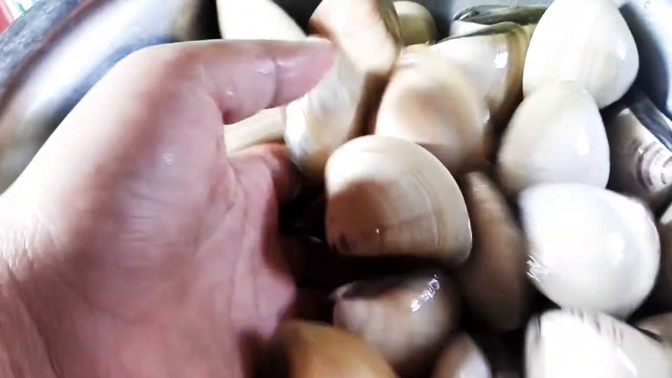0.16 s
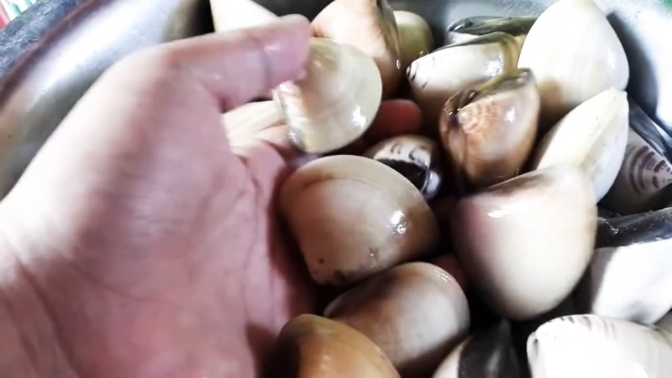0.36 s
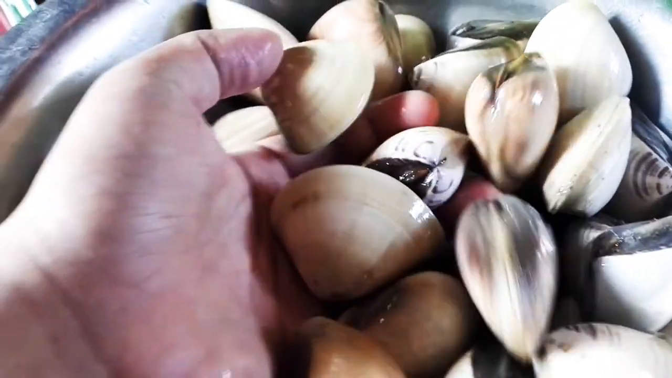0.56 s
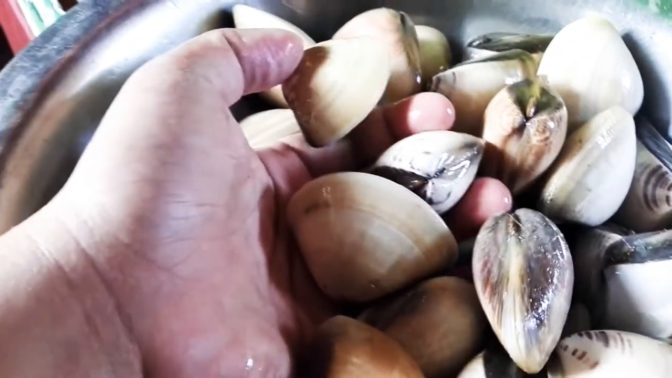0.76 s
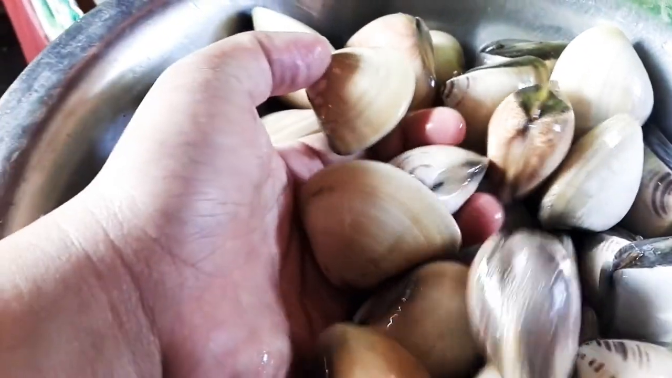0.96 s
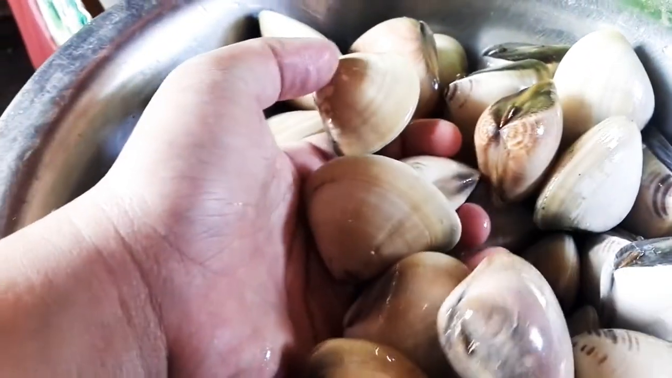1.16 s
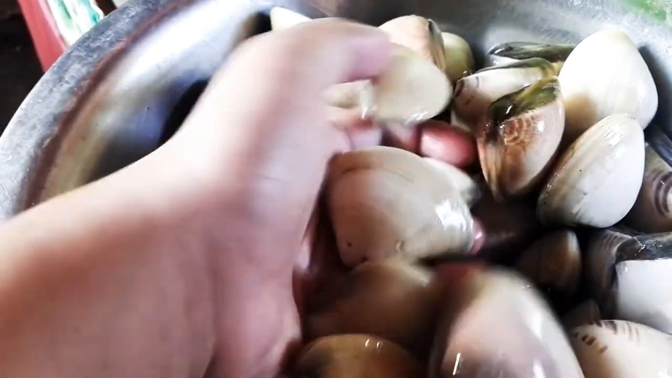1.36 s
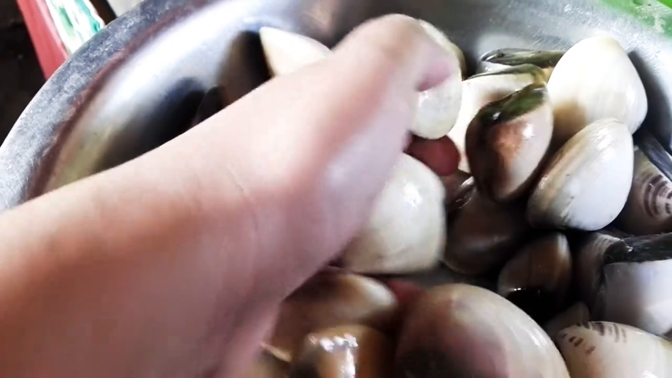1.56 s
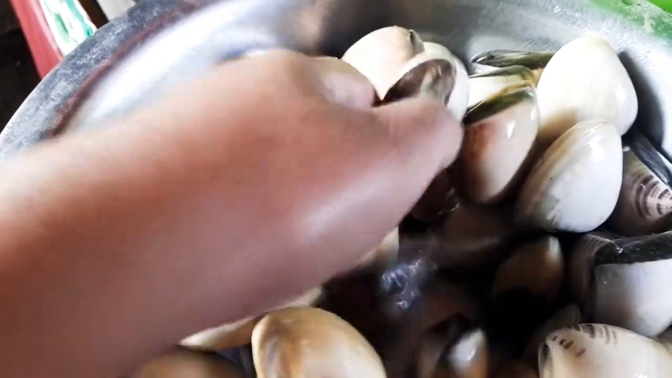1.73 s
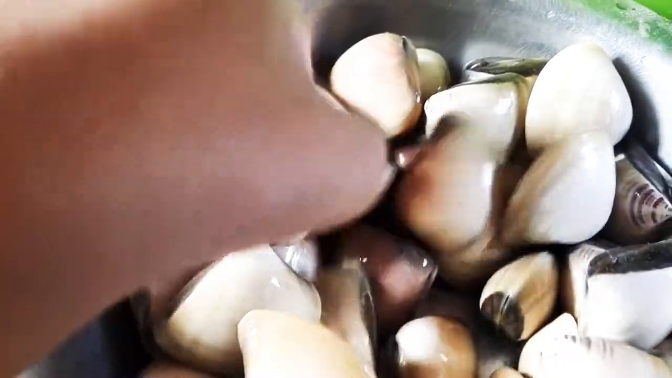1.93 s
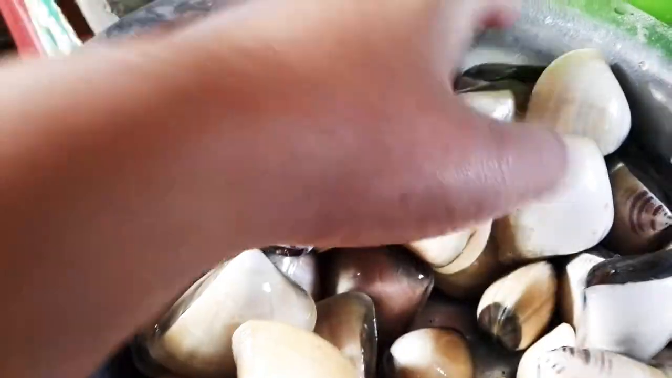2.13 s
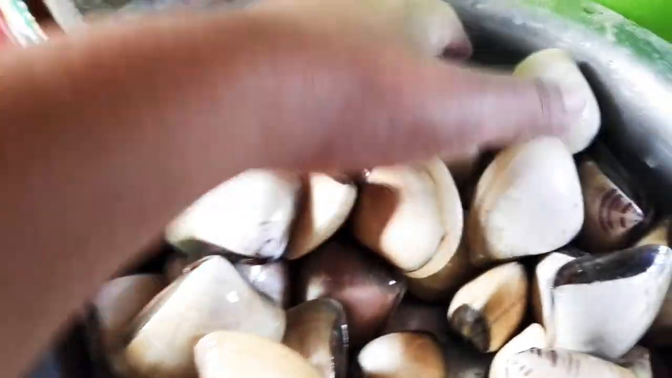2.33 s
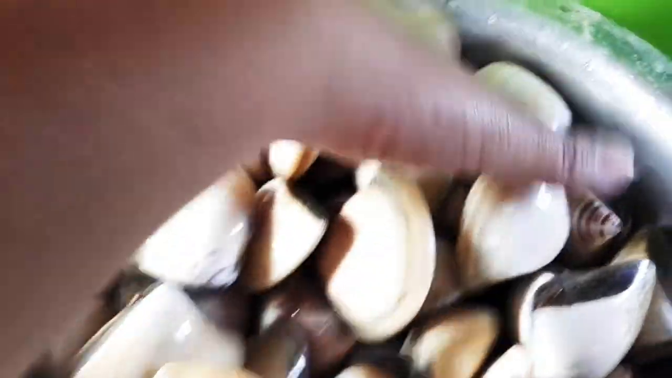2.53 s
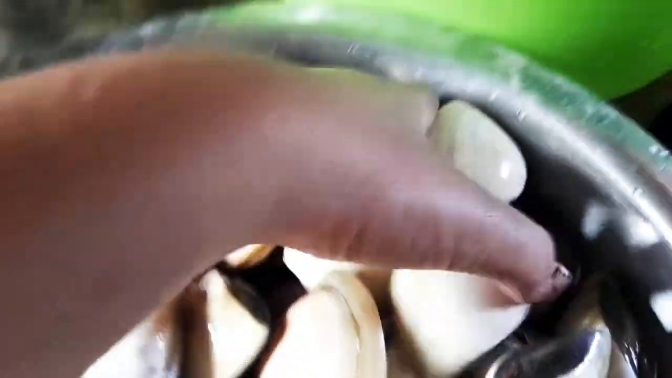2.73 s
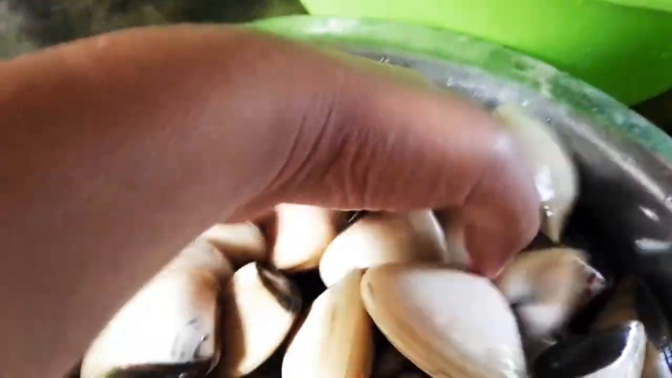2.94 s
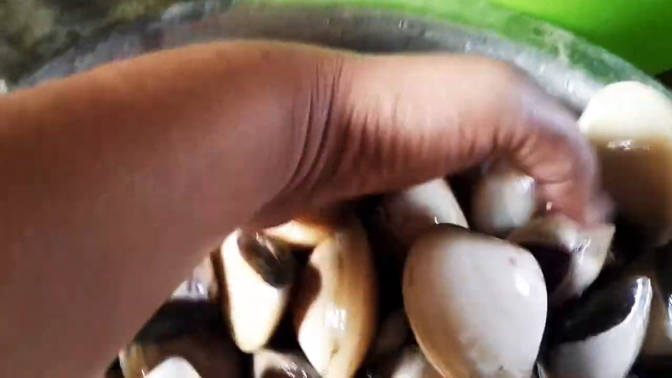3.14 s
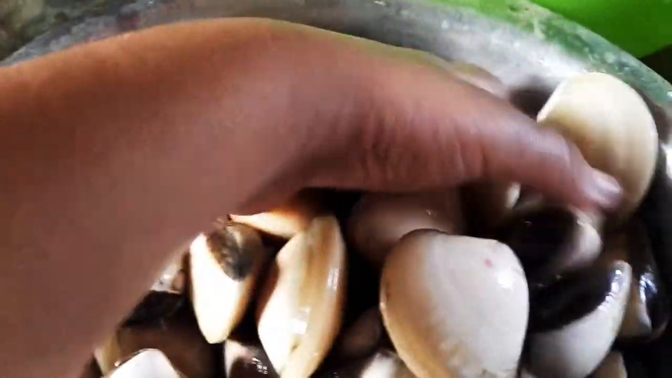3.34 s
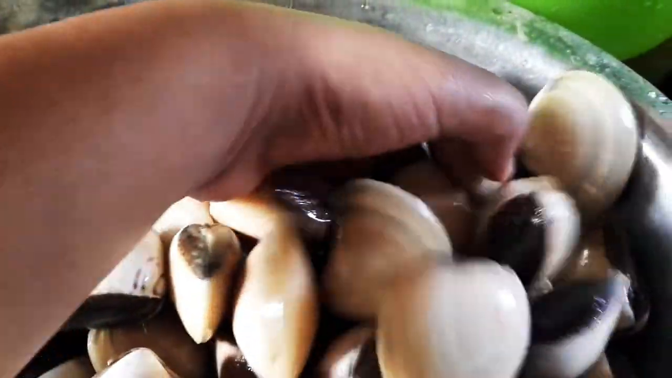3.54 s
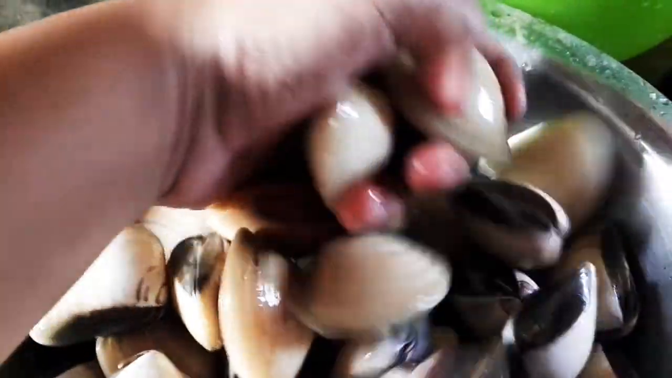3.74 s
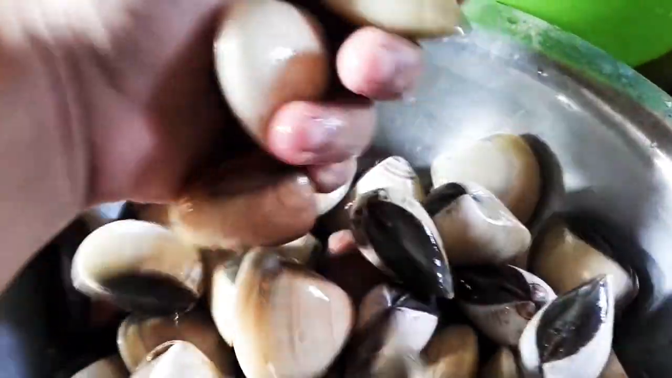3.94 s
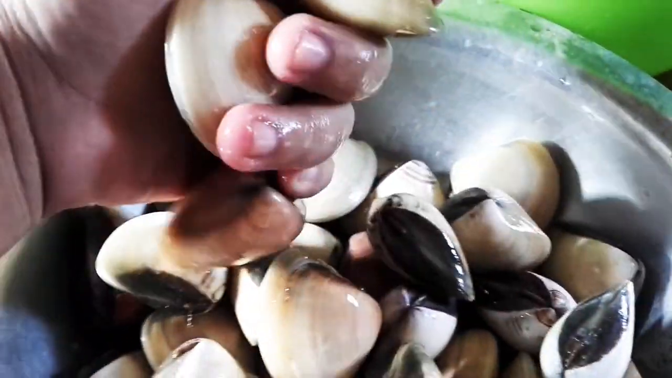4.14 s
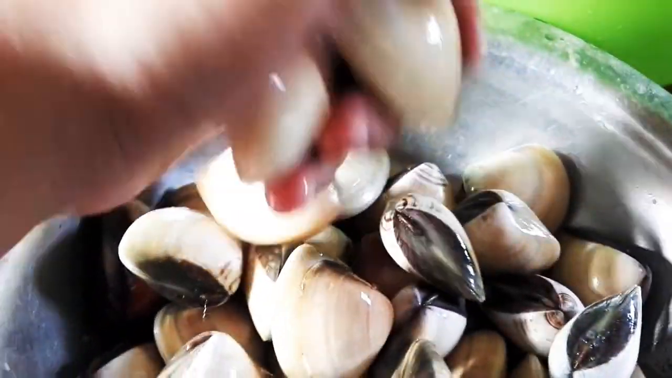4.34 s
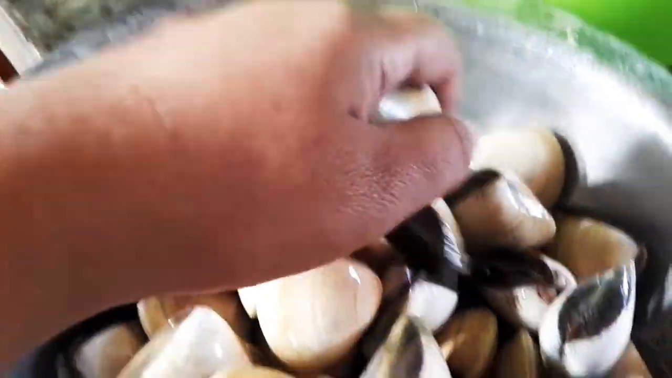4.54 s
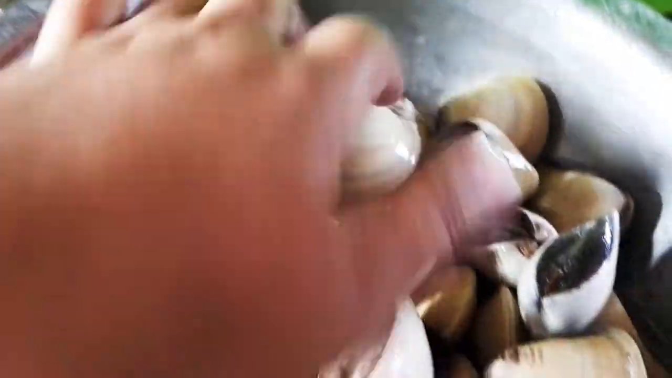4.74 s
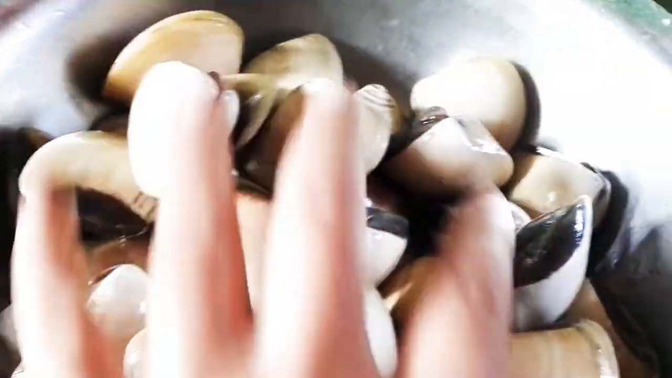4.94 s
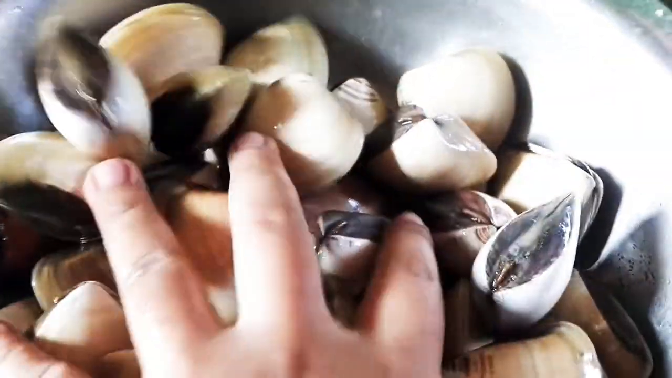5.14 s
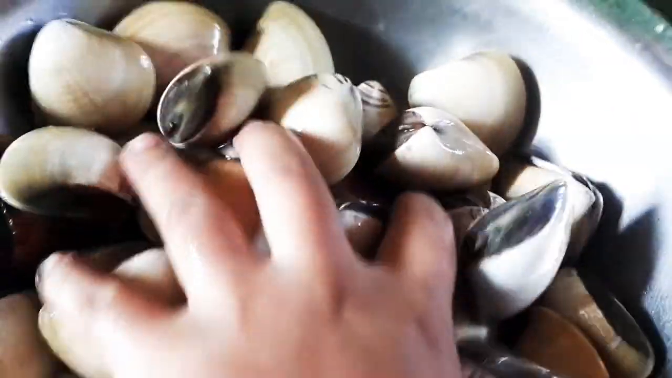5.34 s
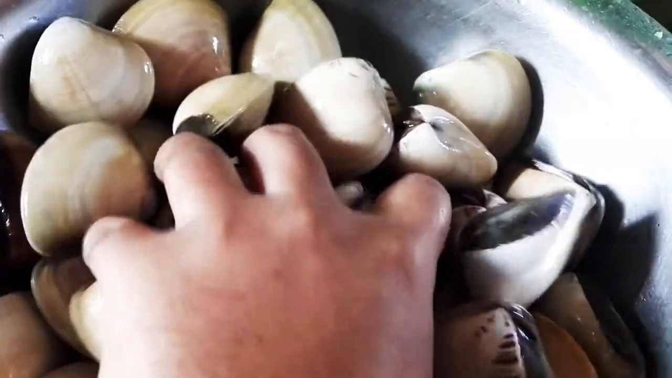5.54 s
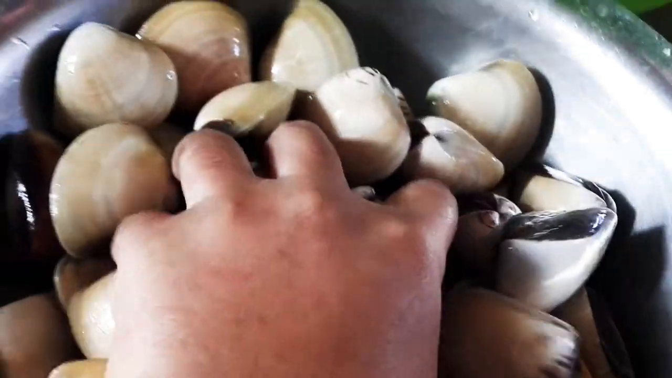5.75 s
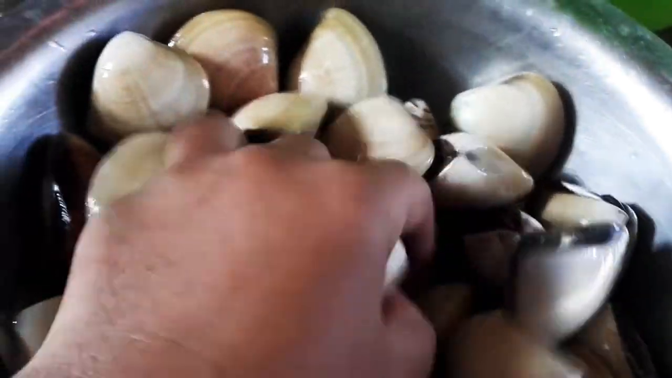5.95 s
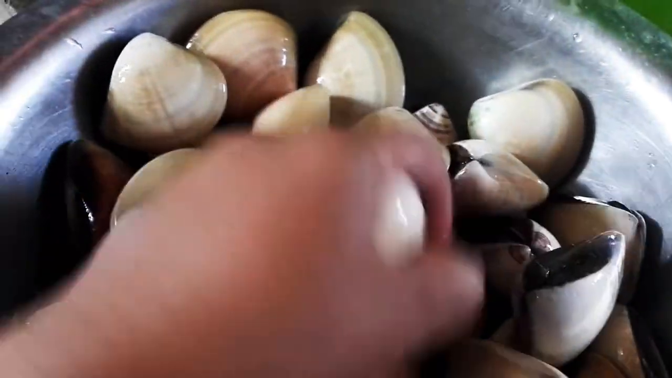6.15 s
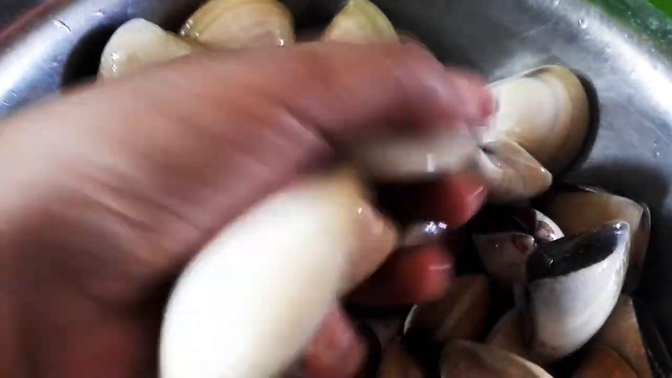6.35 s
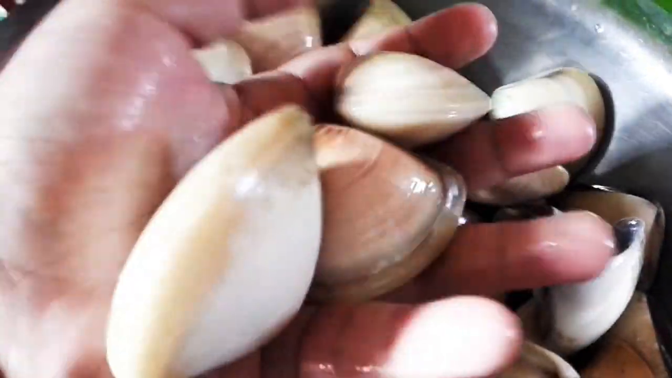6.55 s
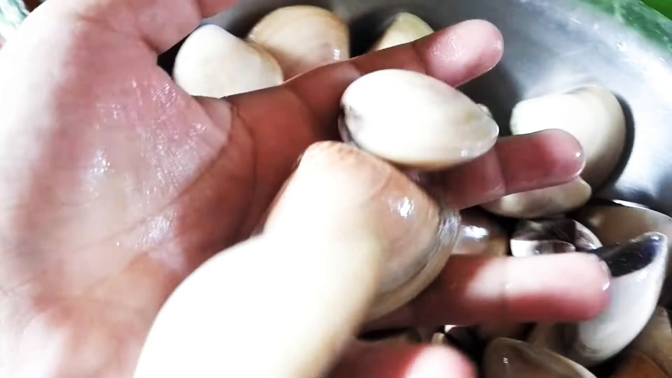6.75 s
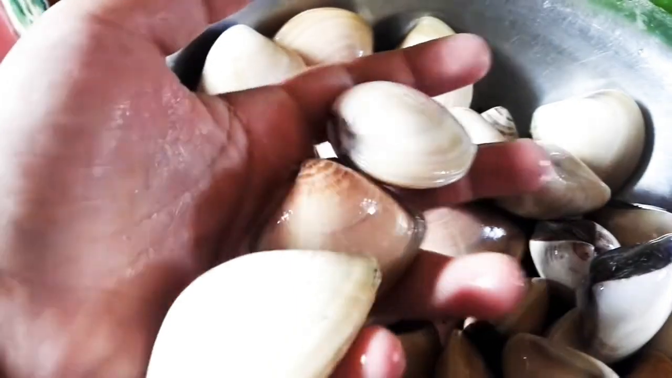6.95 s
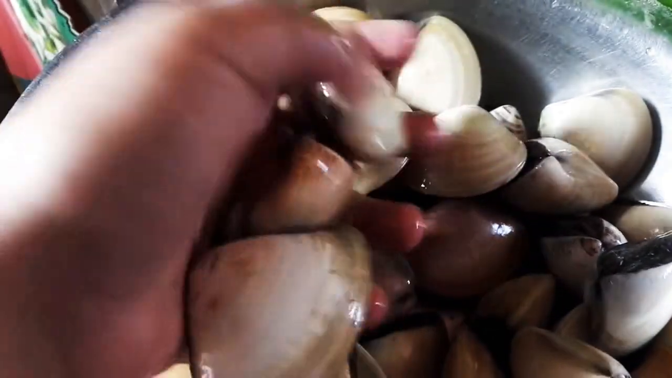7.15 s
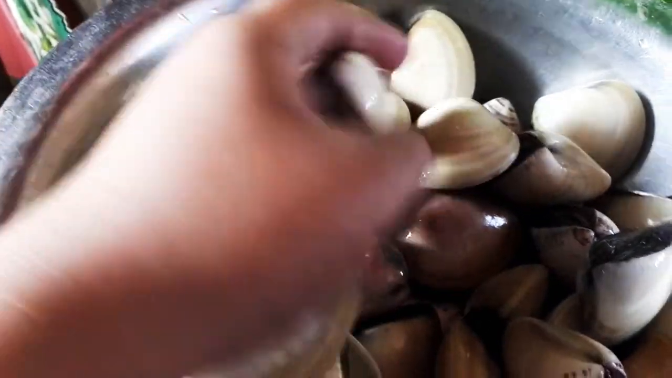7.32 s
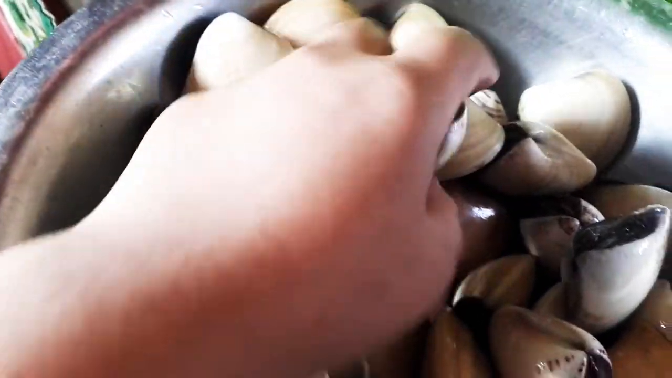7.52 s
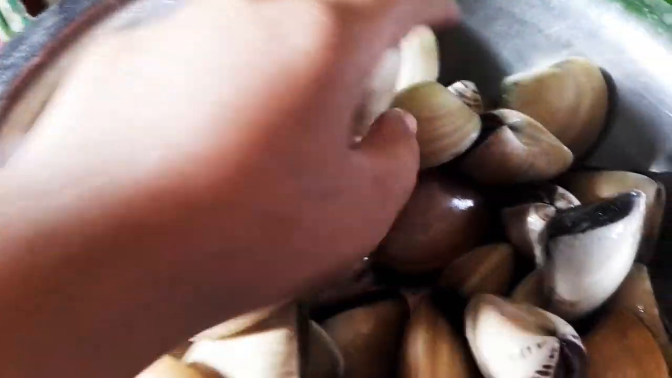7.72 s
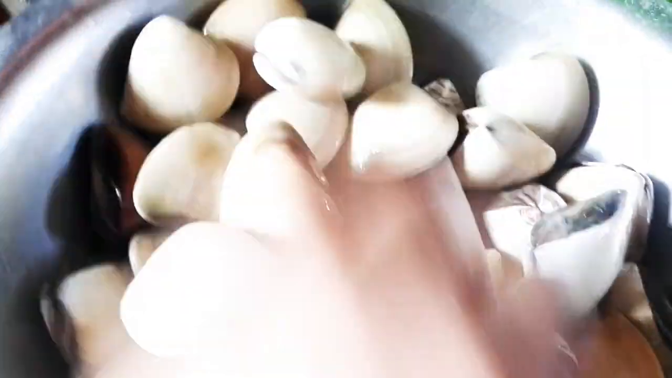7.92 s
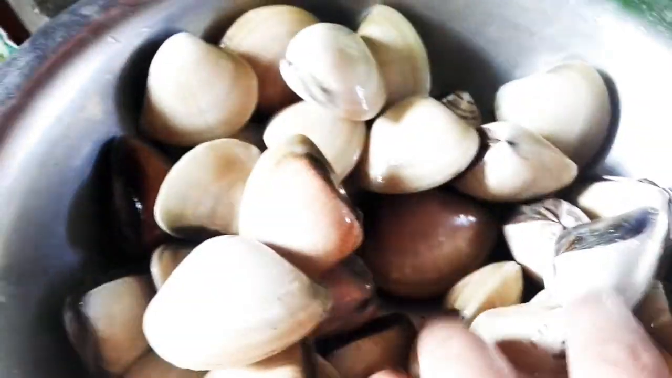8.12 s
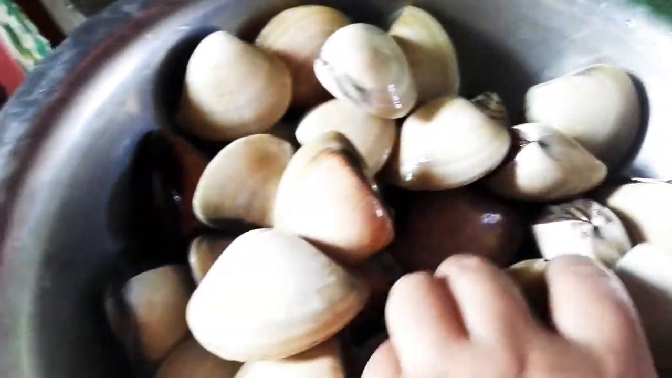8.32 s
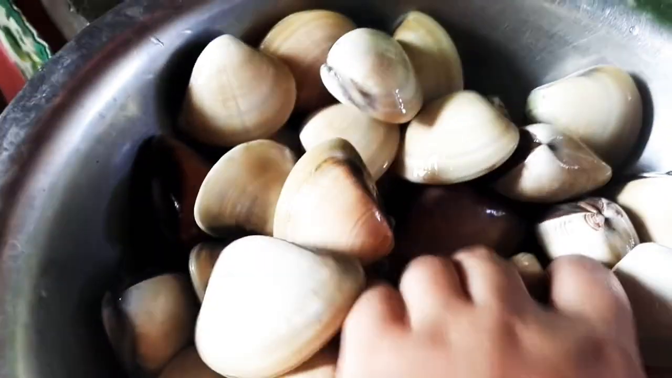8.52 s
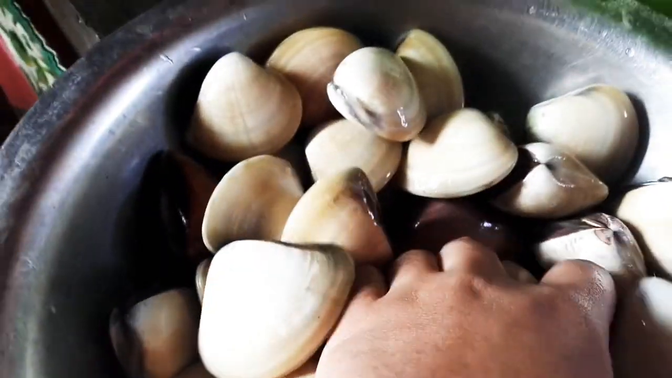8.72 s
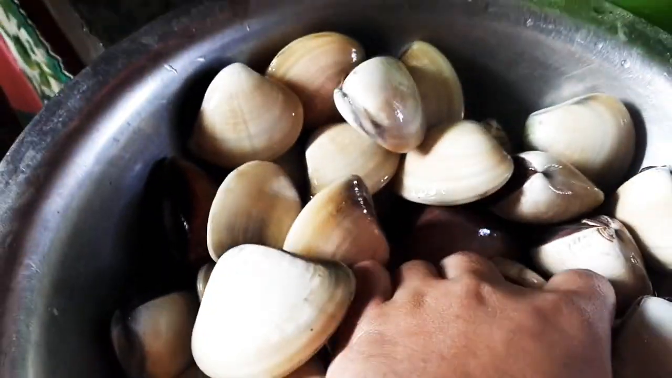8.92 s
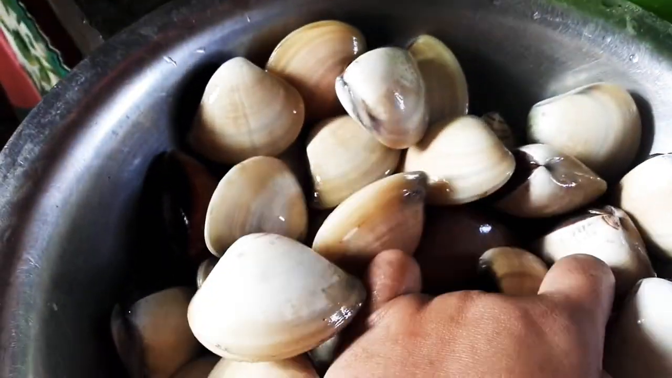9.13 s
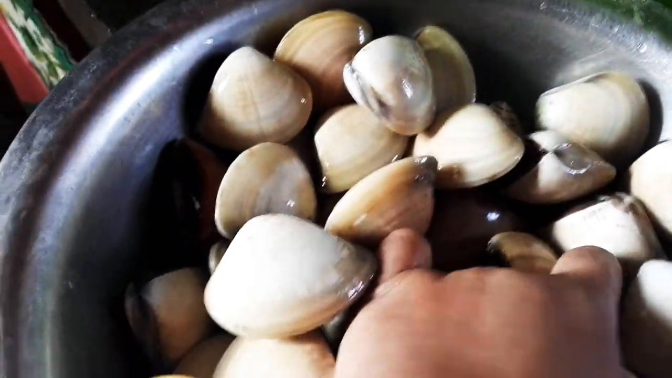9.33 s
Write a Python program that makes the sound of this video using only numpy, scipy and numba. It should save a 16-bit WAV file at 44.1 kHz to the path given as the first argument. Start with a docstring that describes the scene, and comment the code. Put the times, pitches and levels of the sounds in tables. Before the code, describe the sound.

A hand stirs wet clam shells in a metal bowl, heard close in stereo in a small room. From 0 s shells grind and give quick hollow clacks, with a small rough squeak near 0.45 s. They thin out around 1 s, then the hardest, brightest crash bursts at about 1.8 s, slightly overloaded, and tumbles to 2 s. Scrapes and knocks return at 2.4 to 4 s, strong near 3 and 3.8 s, nearly pausing around 4.2 s. A rapid clatter follows at 4.4 to 4.8 s, then grinding swells from 5.2 to 6.1 s. After 6.4 s it is almost quiet: distant traffic rumble, growing towards the end, and a faint wavering low engine drone, also heard earlier at about 0.6-1.6 and 2.3-3 s. A faint squeak at 7.2 s precedes light knocks from 7.4 s, then grinding at 8.4 s and a stronger scrape near 9 s.

```python
"""A hand stirs wet clam shells in a metal bowl under a phone with two microphone ports, over distant traffic.
From the start shells grind as modulated noise and knock as damped modes; bowl and small room answer.
Narrow rough tones, squeaks and one shell's ring, join near 0.4 s; an engine drone of two wavering sines
near 0.6 s, in three spells. The hardest crash falls near 1.8 s; the shells quieten after 6.4 s,
then knock and grind again towards the end."""
import sys
import numpy as np
from scipy import signal
from scipy.fft import rfft, irfft
from scipy.io import wavfile
from scipy.ndimage import uniform_filter1d
from numba import njit

SR = 44100
rng = np.random.default_rng(int(sys.argv[2]) if len(sys.argv) > 2 else 0)


def master(y):
    """Save y as 16-bit WAV."""
    cut = np.clip(np.atleast_2d(y).T, -1, 1)
    pcm = np.round(cut * 32767)  # scale
    wavfile.write(sys.argv[1], SR, pcm.astype(np.int16))


N = 413658

# single knocks: (time [s], level of the modes above 500 Hz [dB], hollow pitch [Hz],
# low-mode setting [dB], treble setting [dB]); the last two are relative and enter contacts() with offsets
SINGLE_KNOCKS = [(0.011, -18, 1250, -2, -27.5), (0.039, -20.5, 1210, -16, -16), (0.116, -26, 795, 21, -17),
                 (0.146, -14, 794, -38, -31), (0.195, -11, 1360, -16, -13), (0.261, -13.5, 1030, -16, -28),
                 (0.287, -11.5, 1500, -23, -24), (0.301, -10, 1440, -6, -20),
                 (0.356, -20, 2800, -21.5, -27), (0.433, -27.5, 1030, -11, -25),
                 (0.582, -20, 2150, -13, -9), (0.615, -24.5, 1040, -8, -4.5),
                 (0.678, -14.5, 4330, -5, -13.5), (0.942, -44, 2100, -14, -29),
                 (1.023, -23.5, 1230, -25, -36), (1.047, -32, 5000, -15, -20),
                 (1.166, -32.5, 2400, -18, -7.5), (1.379, -17.5, 1420, -6, -17),
                 (1.621, -23.5, 780, -16.5, -18), (1.718, -10, 514, 0.5, -13.5), (1.758, 4, 774, -9, -9),
                 (1.769, 8, 1900, -17, -16), (1.8, -6, 770, -8.5, -11), (1.878, -15.5, 790, -10, -11.5),
                 (1.947, -9, 1254, -23, -8.5), (2.23, -40, 770, -7, 2.5), (2.313, -15.5, 950, -24, -26),
                 (2.411, -20, 2870, -21, -5.5), (2.454, -14.5, 790, -13, -4), (2.738, -31, 3100, -20, -10),
                 (2.767, -25.5, 1184, -33, -9), (2.806, -19.5, 830, -31.5, -5.5),
                 (2.942, -21.5, 2700, -1, -20), (2.995, -6.5, 800, -14.5, -11), (3.139, -11, 4830, -3, -9),
                 (3.18, -22, 553, -10.5, -24), (3.221, -17.5, 816, 2, -8), (3.31, -19, 765, -11.5, -37.5),
                 (3.375, -19.5, 2520, -7.5, -23), (3.394, -20, 2630, -23.5, 3.5),
                 (3.509, -21.5, 800, -23, -15.5), (3.594, -15, 2780, -19.5, -16),
                 (3.774, -5.5, 885, -5, -12), (3.883, -8.5, 706, -18, -3.5), (3.919, -15, 746, -9, -26),
                 (3.989, -22, 1390, -6.5, -12.5), (4.147, -48, 2005, -21, -35),
                 (4.256, -42.5, 711, -3.5, -39.5), (4.375, -28.5, 930, -14, -21.5),
                 (4.431, -16, 760, -17, -13.5), (4.453, -11.5, 686, -10.5, -11.5),
                 (4.565, -14.5, 860, 1.5, -7), (4.658, -12.5, 759, -15.5, -15),
                 (4.696, -18.5, 2400, -4, -18), (4.727, -23, 777, -0.5, -8), (4.763, -24.5, 704.6, 1, -6),
                 (4.788, -9, 687, -8, -8), (4.802, -20.5, 712, -13, -0.5), (5.081, -20.5, 766, -5, -4),
                 (5.156, -18, 2460, -24, -21), (5.275, -14, 3300, -10.5, 5.5), (5.326, -15, 3180, 7, -3),
                 (5.502, -17.5, 2840, -12, -23), (5.554, -11.5, 1400, -42, -28),
                 (5.702, -9, 1150, 0.5, -10.5), (5.998, -7.5, 686, -0.5, -25),
                 (6.109, -18.5, 3000, -9, -17), (6.122, -12, 3000, -15, -9), (6.134, -12.5, 3050, -6, -13),
                 (6.279, -26, 770, 9, -1), (6.32, -10.5, 2280, -8, -15.5), (6.375, -21, 830, -28, -31),
                 (6.413, -31.5, 880, -9, -31.5), (7.243, -30.5, 3240, -37.5, -4),
                 (7.336, -47, 3000, -23.5, 14), (7.412, -28.5, 1015, -15, -9), (7.488, -31, 786, -28, -31),
                 (7.623, -22, 830, -16.5, -25.5), (7.636, -13.5, 840, -21, -12.5),
                 (7.668, -20, 860, -21, -22), (7.678, -9.5, 855, -19.5, -8.5),
                 (7.76, -17.5, 857, -21, -6.5), (7.801, -23.5, 860, -18.5, -33),
                 (7.87, -21.5, 744, -10.5, -17), (7.902, -20.5, 890, -18, -34),
                 (8.036, -30.5, 808, -11, -27), (8.174, -32.5, 845, -16, -25), (8.211, -18, 2670, -5, -35),
                 (8.268, -14.5, 715, -26, -18.5), (8.308, -13, 2150, -14, -4),
                 (8.363, -17.5, 1900, -8, -12), (8.579, -14.5, 1090, -25, -32.5),
                 (8.785, -19, 564, -9.5, -21), (8.944, -34, 2550, -18, -4), (8.991, -25, 885, -20, 2),
                 (9.025, -22, 756, -29, 8), ]
# average spectrum of struck shell: (frequency [Hz], relative density [dB per Hz])
SHELL_SPECTRUM = [(170, -37.5), (290, -3.5), (450, -2.5), (790, -4), (1200, -5.5), (2000, -3), (5000, -9.5),
                  (14000, -18)]


def undb(db):
    """Amplitude gain of a level in dB: a factor of ten for every 20 dB."""
    return 10 ** (np.asarray(db) / 20)


def shape(table, hz):
    """A spectrum interpolated on a logarithmic frequency axis, where equal steps are equal intervals."""
    f, v = np.transpose(table)
    return np.interp(np.log(hz), np.log(f), v)


def band(x, lo_hz, hi_hz):
    """Band-pass filtering: only components between two cutoff frequencies pass freely."""
    return signal.sosfilt(signal.butter(2, [lo_hz, hi_hz], "band", fs=SR, output="sos"), x)


def coloured(table, alike_hz):
    """Spectrally shaped noise, rms 1; mid and side sums make the ports more alike towards the bass."""
    hz = np.maximum(np.fft.rfftfreq(N, 1 / SR), 1)
    mid, side = rfft(rng.standard_normal((2, N))) * undb(shape(table, hz))
    side *= np.clip(hz / alike_hz, .05, 1)
    x = irfft(np.array([mid + side, mid - side]), N)
    return x / x.std()


def traffic():
    """Broadband noise with most energy in the bass: a rumble alike at both ports, thinning into unrelated hiss."""
    # background level over time, rumble and hiss together, lowest near 4.2 s: (time [s], level [dB])
    background_level = [(0, -49.5), (2.102, -57.5), (3.198, -56), (4.2, -60.5), (5.5, -51.5), (8.2, -45),
                        (8.7, -41.5), (9.38, -42)]
    # spectrum of the background: (frequency [Hz], relative density [dB per Hz])
    background_colour = [(20, -4.5), (97, -5), (131, -6.5), (210, -16), (278, -20), (539, -35.5),
                         (13400, -62)]
    t, db = np.transpose(background_level)
    return coloured(background_colour, 600) * undb(np.interp(np.arange(N) / SR, t, db))


def hand(s):
    """Power addition of independent sources: level and brightness at times s from pushes and settling."""
    # pushes through the heap: (time of maximum [s], level [dB], swell over 20 dB [s], fade over 20 dB [s],
    # brightness [dB per octave])
    hand_pushes = [(0, -24, .1, 0.1, -0.5), (.31, -23.5, 0.38, 0.066, -0.5),
                   (0.528, -28.5, 0.13, 0.054, -0.5), (1.032, -37.5, 0.04, 0.13, -3.5),
                   (1.46, -33, 0.13, 0.052, 0.5), (1.78, -13.5, 0.13, 0.1, -0.5),
                   (1.911, -14, 0.059, 0.091, -2), (2.013, -23, 0.25, 0.022, 0.5),
                   (2.447, -23, 0.057, 0.18, 0.3), (2.653, -28.5, 0.35, 0.11, -0.5),
                   (2.82, -28.5, 0.046, 0.61, -1), (3.001, -19.5, 0.1, 0.43, -0.4),
                   (3.24, -31, 0.12, 0.17, 1.2), (3.513, -28, 0.0094, 0.083, -0.5),
                   (3.785, -17, 0.24, 0.13, -1), (3.899, -20.5, 0.21, 0.078, -2.5),
                   (4.016, -30, 0.08, 0.045, 0.5), (4.309, -54, 0.078, 0.12, -6.5),
                   (4.59, -23.5, 0.028, 0.041, -1.5), (5.03, -32, 0.0053, 0.95, 2.5),
                   (5.3, -21.5, 0.19, 0.27, 0.1), (5.57, -25.5, 0.21, 0.18, -1),
                   (5.71, -25, 0.019, 0.11, -0.4), (5.916, -18, 0.077, 0.21, 2.5),
                   (6.016, -12.5, 0.16, 0.018, -2), (6.125, -27.5, 0.042, 0.39, -1),
                   (6.95, -64, 0.81, 0.81, -4), (7.4, -56.5, 0.75, 0.565, 3.5),
                   (7.9, -43.5, 0.49, 0.15, -4.5), (8.45, -26.5, 0.12, 0.12, 1.5),
                   (8.58, -36, 0.032, 0.29, -1), (8.796, -32, 0.25, 0.1, 2.5),
                   (9.043, -14.5, 0.068, 0.088, -0.5), (9.233, -36.5, 0.052, 0.038, -1.5),
                   (9.341, -36, 0.055, 0.043, 0.5)]
    # the heap shifting after a knock: level re the knock, rate of fall, brightness per octave
    settle_db, settle_db_per_s, settle_tilt_db = -17, 253, -1.5
    rest_db = -78  # the hand holding shells still
    t = np.arange(0, N / SR + .01, .002)
    at, db, swell, fade, tilt = np.transpose(hand_pushes)[..., None]
    away = np.where(t < at, (at - t) / swell, (t - at) / fade)
    push = undb(db - 10 * away * (1 + away)) ** 2  # flanks grow ever steeper
    hit, peak_db = np.transpose(SINGLE_KNOCKS)[:2, :, None]
    fallen_db = settle_db_per_s * np.abs(t - hit)
    settle = np.sum((t > hit) * undb(peak_db + settle_db - fallen_db) ** 2, axis=0)
    power = push.sum(axis=0) + settle + undb(rest_db) ** 2
    # brightness is the power-weighted mean
    tilt_db = (np.sum(push * tilt, axis=0) + settle * settle_tilt_db) / power
    return np.interp(s, t, 10 * np.log10(power)), np.interp(s, t, tilt_db)


def wander(rate_hz):
    """Low-frequency random modulation: held random values, smoothed over one holding time."""
    hold = int(SR / rate_hz)
    steps = np.repeat(rng.standard_normal(N // hold + 1), hold)
    return uniform_filter1d(steps, size=hold)[:N]


def scraping():
    """Stick-slip friction: wet ridged shells rasp in sudden bursts while the noise's colour keeps shifting."""
    level_db, tilt_db = hand(np.arange(N) / SR)
    # ridges catch at random, 260 per second on average, and let go: power falls 60 dB in 41 ms
    catch = (rng.random(N) < 260 / SR) * rng.exponential(size=N) ** 2
    burst = signal.lfilter([1], [1, -undb(-120 / (0.041 * SR))], catch)
    slip_db = 10 * np.log10(0.9 + burst / burst.mean())
    noise = coloured(SHELL_SPECTRUM, 1300)
    out = np.zeros((2, N))
    for k, hz in enumerate(250 * 2 ** (np.arange(18) / 3)):  # third-octave bands
        # other shells touch from moment to moment, so other narrow bands stand out
        db = level_db - 11.5 + tilt_db * np.log2(hz / 1500) + slip_db + 5.36 * wander(35)
        # alternating sign lets neighbouring bands join in phase
        out += (-1) ** k * band(noise, hz, 2 ** (1 / 3) * hz) * undb(db)
    return out


@njit
def ring(start, hz, t60, left, right, n, sr):
    """Damped free vibration: each mode is a decaying complex phasor, weighted separately for the two ports."""
    out = np.zeros((2, n))
    for k in range(len(start)):
        step = np.exp(2j * np.pi * hz[k] / sr - np.log(1000) / (t60[k] * sr))
        phasor = 1 + 0j
        for i in range(start[k], min(n, start[k] + int(.8 * t60[k] * sr))):
            out[0, i] += (phasor * left[k]).imag
            out[1, i] += (phasor * right[k]).imag
            phasor *= step
    return out


def contacts(s, peak_db, hollow_hz, low_db, high_db, ring_s, count):
    """Impact excitation: strikes at times s wake damped modes, and a noise crack too dense to hear as modes."""
    u = rng.random((len(s), count, 5))
    # one mode in each of count equal intervals from 200 Hz to 8 kHz
    hz = 200 * (8000 / 200) ** ((np.arange(count) + u[..., 0]) / count)
    t60 = ring_s * (hz / 1000) ** -.5 * (.5 + u[..., 1])
    # a contact is a quick stutter of touches, so its modes start up to 1.5 ms apart
    start = ((s[:, None] + .0015 * u[..., 2] ** 3) * SR).astype(np.int64)

    # mode levels in dB
    thud = np.clip(np.log2(1600 / hz) / 1.72, 0, 2) * (low_db[:, None] + 3.0)
    # a soft touch wakes few high modes
    soft = np.clip(np.log2(hz / 2000), 0, 2) * 0.36 * np.minimum(high_db[:, None] + 8.5, 0)
    # the cupped shell favours one pitch
    hollow = 13.8 * np.exp(-(np.log2(hz / hollow_hz[:, None]) / 0.3) ** 2)
    scatter = 11.0 * (u[..., 3] - .5)
    mode_db = shape(SHELL_SPECTRUM, hz) + thud + hollow + soft + scatter
    size = undb(mode_db) * np.sqrt(hz / t60)
    above_500 = np.sqrt(np.sum(size ** 2 * (hz > 500), axis=1))
    size *= (undb(peak_db) / above_500)[:, None]

    # long waves reach both ports nearly alike, short ones with scattered phase
    turn = np.exp(1j * np.pi * np.clip(hz / 1600, 0, 1) * (u[..., 4] - .5))
    side = undb(1.9 * (u[:, 0, 0] - .5))
    left = size * side[:, None] * turn
    right = size / side[:, None] / turn
    out = ring(start.ravel(), hz.ravel(), t60.ravel(), left.ravel(), right.ravel(), N, float(SR))

    # the crack: a middle band and a treble band, each (from [Hz], to [Hz], level [dB], T60 [s])
    noise = coloured(SHELL_SPECTRUM, 900)
    middle = (1157, 3700, peak_db + 0.25 * high_db - 8.5, 0.018)
    treble = (4740, 22000, peak_db + high_db - 1.3, 0.036)
    for lo_hz, hi_hz, db, t60_s in (middle, treble):
        power = np.zeros((2, N))
        np.add.at(power, (slice(None), (s * SR).astype(int)), (undb(db) * [side, 1 / side]) ** 2)
        envelope = np.sqrt(signal.lfilter([1], [1, -undb(-120 / (t60_s * SR))], power))
        crack = band(noise, lo_hz, hi_hz)
        out += crack / crack.std() * envelope
    return out


def clatter(per_s=170):
    """Random impacts at a constant mean rate: small bumps follow the heap's level, a few much stronger."""
    u = rng.random((int(per_s * N / SR), 5)).T
    s = u[0] * (N - 1) / SR
    level_db, tilt_db = hand(s)
    peak_db = level_db + 0.14 - 2.37 * np.log(1 - .97 * u[1])
    hollow_hz = 400 * 9.2 ** u[4]
    low_db = -11.5 - tilt_db + 10 * (u[2] - .5)
    high_db = -13 + 2 * tilt_db + 13.0 * (u[3] - .5)
    return contacts(s, peak_db, hollow_hz, low_db, high_db, ring_s=.025, count=19)


def knocks():
    """Modal response to single impacts: shells hitting the heap or the bowl."""
    return contacts(*np.transpose(SINGLE_KNOCKS), ring_s=0.052, count=36)


def bowl(x, level_db=-8):
    """Resonance: the metal wall, driven by the shells, rings on in its own modes as a bank of peak filters."""
    # wall modes: (frequency [Hz], bandwidth [Hz], gain before level_db is added [dB])
    wall_modes = [(267.7, 27, -1), (354.8, 10, 4.5), (447, 17, 4.5), (540, 26, 0.5), (806, 240, 7),
                  (1406, 40, -3), (1877, 40, -4.5), (2350, 34, -4)]
    out = np.zeros_like(x)
    for hz, width_hz, db in wall_modes:
        out += undb(db + level_db) * signal.lfilter(*signal.iirpeak(hz, hz / width_hz, SR), x)
    return out


def room(x):
    """Diffuse reverberation: convolution with decaying noise, duller as it fades, alike at the ports in the bass."""
    t60_s, level_db = 0.16, -12
    t = np.arange(SR // 2) / SR
    mid, side = rng.standard_normal((2, len(t)))
    side = band(side, 800, 16000)
    noise = np.array([mid + side, mid - side])
    dull = signal.lfilter([.25], [1, -.75], noise)
    # the bright part dies four times as fast
    tail = dull * undb(-60 * t / t60_s) + 1.5 * noise * undb(-60 * t / (0.25 * t60_s))
    tail *= undb(level_db) / np.sqrt(np.sum(tail ** 2, axis=1, keepdims=True))
    return signal.fftconvolve(x, tail, axes=1)[:, :N]


def narrow_tones():
    """Random frequency and amplitude modulation of a sine: narrow rough tones that glide, swell and fade."""
    # squeaks of sliding shells, and near 4.8 s a struck shell's ring:
    # (start [s], length [s], first frequency [Hz], last frequency [Hz], level before roughness [dB])
    rough_tones = [(0.442, 0.11, 980, 1190, -36.5), (0.499, 0.051, 445, 440, -36.5),
                   (4.797, .2, 1165, 1140, -59), (7.198, 0.16, 2760, 2880, -56)]
    time, out = np.arange(N) / SR, 0
    for s, length, from_hz, to_hz, db in rough_tones:
        along = np.clip((time - s) / length, 0, 1)
        rough = uniform_filter1d(rng.standard_normal(N), size=250)
        waver = uniform_filter1d(rng.standard_normal(N), size=900)
        hz = (from_hz + (to_hz - from_hz) * along) * (1 + 0.018 * waver / waver.std())
        tone = np.sin(2 * np.pi * np.cumsum(hz) / SR)
        tone *= 1 + rough / rough.std()
        out = out + tone * undb(db) * np.sin(np.pi * along)
    return out


def engine():
    """Harmonic synthesis: a wavering partial and a weaker one an octave below, fading in and out."""
    # one list per spell: (time [s], centre frequency of the upper partial [Hz], its rms level [dB])
    drone_spells = [
        [(0.638, 109.4, -68.5), (1.65, 114.6, -50)],
        [(2.3, 110.4, -55.5), (3.034, 129.3, -48.5),],
        [(6.4, 137, -72.5), (6.71, 128.2, -56.5), (8.6, 122.2, -50.5)],
    ]
    time, out = np.arange(N) / SR, np.zeros(N)
    waver = 1 + 0.032 * uniform_filter1d(rng.standard_normal(N), size=4000) * np.sqrt(4000)
    for spell in drone_spells:
        t, hz, db = np.transpose(spell)
        # each fade lasts 0.17 s, centred on the end of the spell
        fade = np.clip(np.minimum(time - t[0], t[-1] - time) / 0.17 + .5, 0, 1)
        turns = np.cumsum(np.interp(time, t, hz) * waver) / SR
        tone = np.sin(2 * np.pi * turns) + 0.58 * np.sin(np.pi * turns)
        out += np.sqrt(2) * tone * undb(np.interp(time, t, db)) * fade
    return out


def scene():
    """Superposition: shells heard directly, through bowl and room, over the far traffic and engine."""
    shells = knocks() + clatter() + scraping() + narrow_tones()
    # small shells radiate no bass
    shells = signal.sosfilt(signal.butter(4, 235, "high", fs=SR, output="sos"), shells)
    shells = shells + bowl(shells)
    return shells + room(shells) + traffic() + engine()


def record(dry):
    """Diffraction round the phone's body shades and delays the ports unevenly; peaks clip and the top is cut."""
    # port contrast: (frequency [Hz], left minus right level [dB], left phase lead [rad])
    port_contrast = [(170, -.6, -.2), (520, -8.5, -1.2), (1300, -1.5, -.3), (12000, 2.5, 0)]
    top_hz = 14400
    hz, db, lead = np.transpose(port_contrast)
    at = np.log(np.maximum(np.fft.rfftfreq(N, 1 / SR), 1))
    # each port takes half of the contrast
    gain = undb(np.interp(at, np.log(hz), db) / 2)
    lean = gain * np.exp(.5j * np.interp(at, np.log(hz), lead))
    ports = irfft(rfft(dry) * [lean, 1 / lean], N)
    clipped = np.clip(ports, -1, 1)
    return signal.sosfilt(signal.ellip(8, .2, 60, top_hz, fs=SR, output="sos"), clipped)


dry = scene()
out = record(dry)
master(out)
```